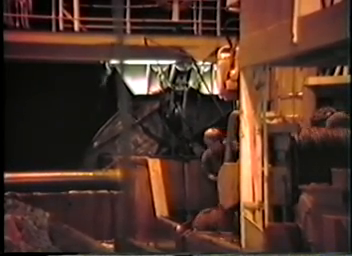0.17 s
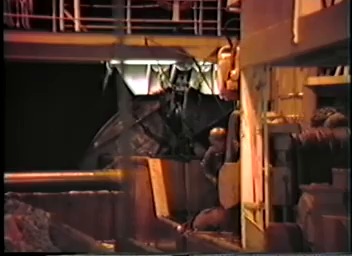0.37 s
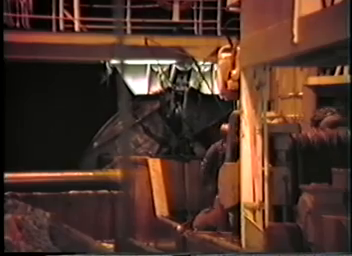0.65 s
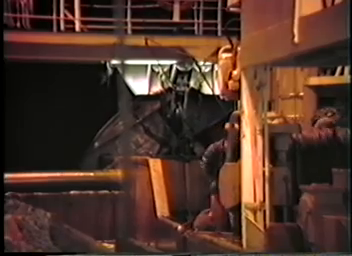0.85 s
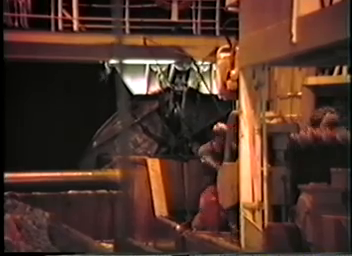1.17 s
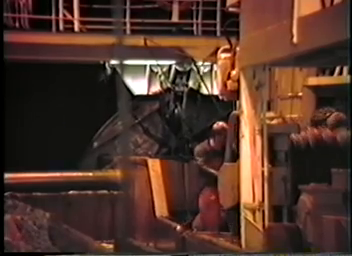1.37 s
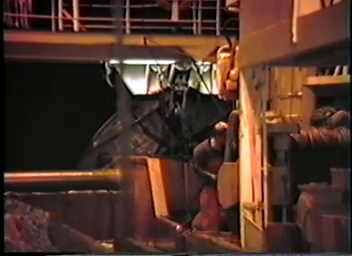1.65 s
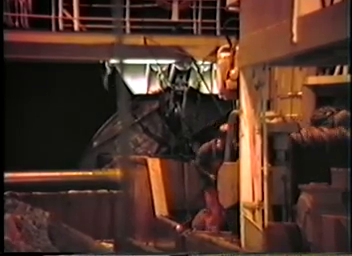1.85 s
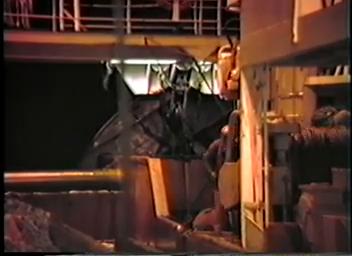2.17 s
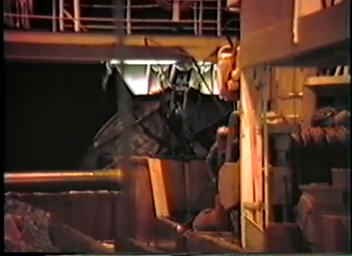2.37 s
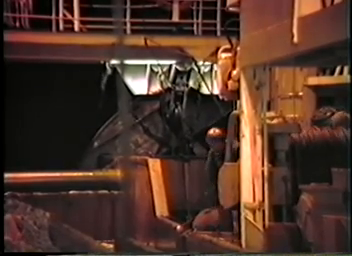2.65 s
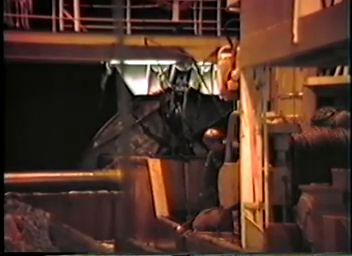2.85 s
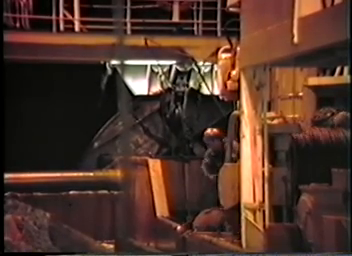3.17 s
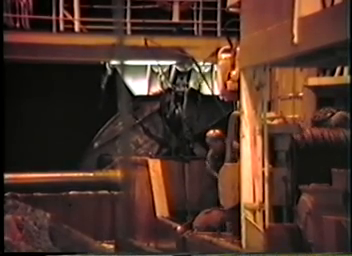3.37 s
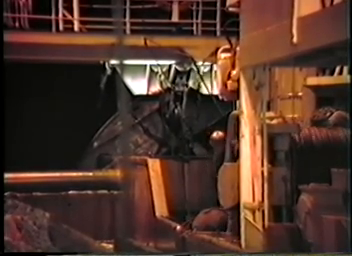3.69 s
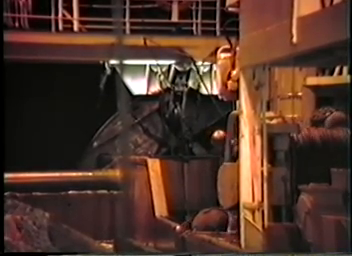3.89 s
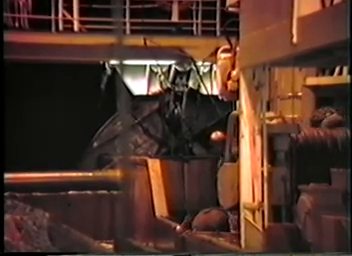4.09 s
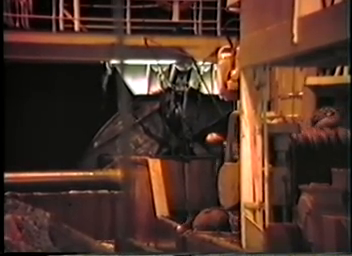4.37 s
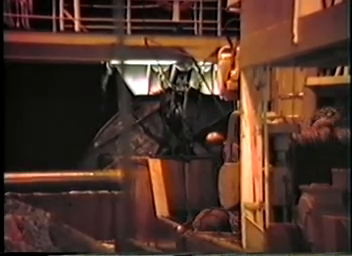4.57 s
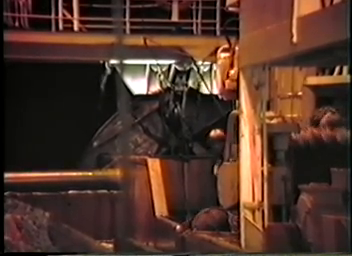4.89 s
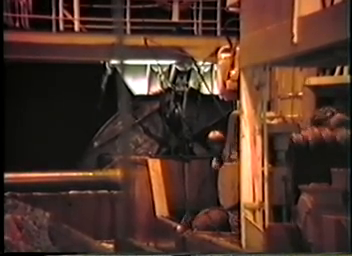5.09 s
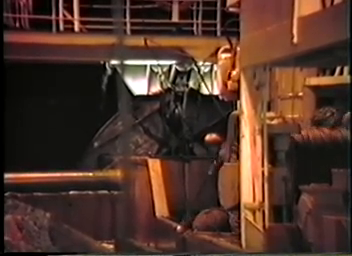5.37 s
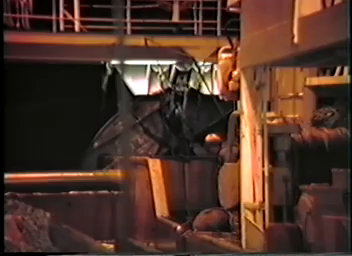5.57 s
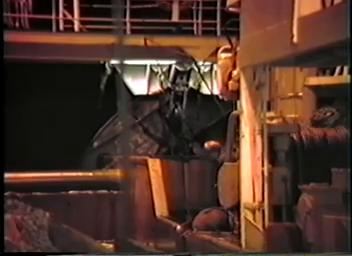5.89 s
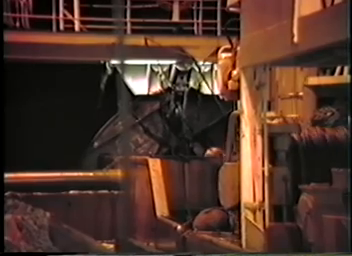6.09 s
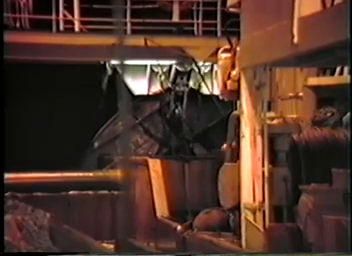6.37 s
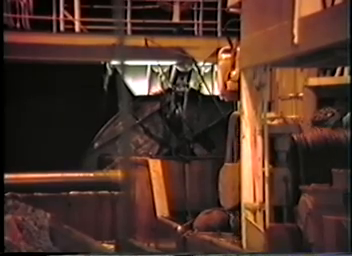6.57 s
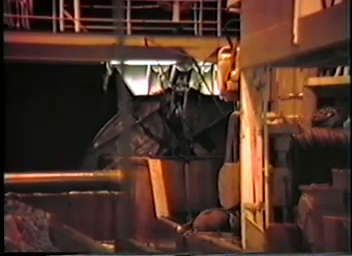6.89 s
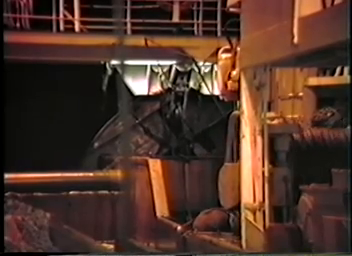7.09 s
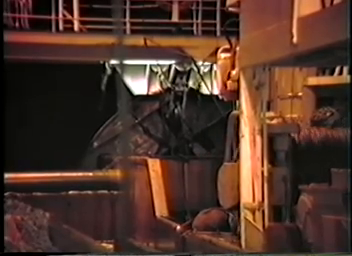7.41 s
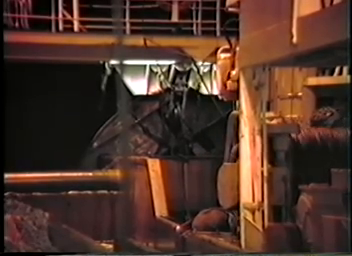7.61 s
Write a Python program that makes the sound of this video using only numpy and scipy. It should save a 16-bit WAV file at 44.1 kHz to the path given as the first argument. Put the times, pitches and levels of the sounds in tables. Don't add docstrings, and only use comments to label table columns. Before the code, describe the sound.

A large ship's diesel runs loudly from the start, repeating an uneven cluster of exhaust pulses about four times a second, one thud far stronger. Gear hum, singing steel plates and a broad fan roar surround it, while a high pump whine throbs three times a second. Faint chain ticks come irregularly. The engine works hardest around three seconds, then eases. Heard a few metres away on an open steel deck, with dull treble, hiss and buzz.

```python
import sys
import numpy as np
from scipy import signal
from scipy.fft import rfft, irfft
from scipy.io import wavfile

SR = 44100
rng = np.random.default_rng(int(sys.argv[2]) if len(sys.argv) > 2 else 0)


def elevation(decibels):
    levels = np.asarray(decibels, float)
    return 10 ** (levels / 20)


def store_wav(level_fs):
    pcm = np.round(np.clip(np.atleast_2d(level_fs), -1, 1) * 32767)
    wavfile.write(sys.argv[1], SR, pcm.T.astype(np.int16))


N = 341334
TIME = np.arange(N) / SR
CYCLE_S, FIRST_CYCLE_S = .240295, .0065


def rms_one(x):
    return x / np.sqrt(np.mean(x ** 2) + 1e-20)


def drift(rate_hz):
    r = np.exp(-80 * np.pi * rate_hz / SR)
    noise = rng.standard_normal(N // 40 + 2002)
    slow = signal.lfilter([1], [1, -2 * r, r * r], noise)[2000:]
    return np.interp(np.arange(N) / 40, np.arange(len(slow)), rms_one(slow))


def swells(rows, width_s):
    return sum(db * np.exp(-((TIME - s) / width_s) ** 2) for s, db in rows)


def coloured(spectrum):
    hz, db = np.transpose(spectrum)
    log_hz = np.log(np.fft.rfftfreq(N, 1 / SR) + 1)
    gain = elevation(np.interp(log_hz, np.log(hz), db))
    return rms_one(irfft(rfft(rng.standard_normal(N)) * gain, N))


def hum(phase, db, wobble, rate_hz):
    return np.sqrt(2) * elevation(db) * np.sin(phase + wobble * drift(rate_hz))


# time in seconds, effort in dB.
LOAD = [
    (0, -.5),
    (.6, .3),
    (3.0, .8),
    (4.9, .6),
    (5.6, -.3),
    (7.74, -.8),
]
# time in seconds, change in dB.
ODD_FIRINGS = [(.37, -1.5), (1.57, 1.2), (2.05, 1.2), (3.01, 1.4), (3.73, -1), (3.97, 1.2), (4.69, -.8),
               (4.93, 1.3), (5.17, -.8), (5.41, 1.2), (6.37, 1.3), (7.34, -1)]


def effort_db():
    s, db = np.transpose(LOAD)
    return np.interp(TIME, s, db) + swells(ODD_FIRINGS, .09)


def pipe(starts, pattern, hz, swell_s):
    after_s, peak_db = np.transpose(pattern)
    at = np.round((starts[:, None] + after_s) * SR).astype(int)
    strength = elevation(peak_db + .8 * rng.standard_normal(at.shape))
    inside = (at >= 0) & (at < N)
    clicks = np.bincount(at[inside], strength[inside], N)
    age = np.arange(SR // 10) / SR
    envelope = (age / swell_s) ** 2 * np.exp(2 - age / swell_s) / 4
    pulse = envelope * np.sin(2 * np.pi * hz * age)
    return signal.fftconvolve(clicks, pulse)[:N]


# seconds after the cycle start, peak level in dB.
FUNNEL = [(0.0162, -30.8), (0.0361, -36.0), (0.0451, -39.8), (0.0598, -35.5), (0.0888, -29.6),
          (0.1194, -30.7), (0.1412, -24.8), (0.1623, -32.1), (0.1868, -32.2), (0.2045, -40.1),
          (0.2152, -29.1), (0.2394, -40.3)]
SILENCER = [(0.0345, -22.8), (0.0491, -22.8), (0.0594, -29.9), (0.0694, -26.6), (0.0846, -24.3),
            (0.1062, -20.5), (0.1267, -19.0), (0.1413, -24.5), (0.1557, -26.9), (0.1779, -27.7),
            (0.22, -28.3), (0.2346, -28.3)]
MANIFOLD = [(0.0281, -18.2), (0.0452, -22.9), (0.0655, -17.1), (0.081, -17.2), (0.1003, -16.6),
            (0.1117, -5.8), (0.1238, -11.2), (0.1355, -16.9), (0.1469, -18.1), (0.1587, -23.0),
            (0.1854, -20.7), (0.2324, -22.3)]
ELBOW = [(0.0187, -21.7), (0.0298, -26.8), (0.0799, -23.1), (0.0909, -15.3), (0.1026, -23.9),
         (0.1175, -27.4), (0.1314, -19.1), (0.155, -21.6), (0.1665, -21.3), (0.1776, -25.9),
         (0.2136, -25.7), (0.239, -27.9)]
HEADS = [(0.0084, -20.8), (0.0273, -18.8), (0.0374, -20.8), (0.0711, -18.3), (0.0886, -21.4), (0.1, -12.6),
         (0.1174, -18.0), (0.1287, -20.8), (0.1402, -19.9), (0.155, -19.1), (0.1836, -18.9),
         (0.2376, -21.2)]


def exhaust():
    starts = FIRST_CYCLE_S + CYCLE_S * np.arange(-1, N / SR / CYCLE_S)
    starts = starts + .0002 * rng.standard_normal(len(starts))
    out = pipe(starts, FUNNEL, hz=91.06, swell_s=.006)
    out += pipe(starts, SILENCER, hz=165.75, swell_s=.004)
    out += pipe(starts, MANIFOLD, hz=285.6, swell_s=.004)
    out += pipe(starts, ELBOW, hz=397, swell_s=.003)
    out += pipe(starts, HEADS, hz=731.1, swell_s=.001)
    return out * elevation(effort_db())


GEAR_TEETH = [10, 12, 17, 192, 226, 452]
GEAR_DB = [-56, -50.5, -58, -32.5, -35, -41.5]


def gears():
    crank = 2 * np.pi * TIME / CYCLE_S + .0035 * drift(3.9)
    out = np.zeros(N)
    for teeth, db in zip(GEAR_TEETH, GEAR_DB):
        out += hum(teeth * crank, db + 2.5 * drift(7), wobble=.14, rate_hz=4)
    return out


# time in seconds, rise in dB.
CASING_SWELLS = [(.08, 7), (1.33, 13), (1.64, 7), (2.3, 6), (2.65, 7), (3.45, 9), (4.37, 10), (5.05, 10),
                 (5.41, 12), (5.63, 7), (6.92, 10), (7.52, 6)]


def generator():
    steady = hum(2 * np.pi * 498 * TIME, -29.5 + 1.8 * drift(9), wobble=.58, rate_hz=2.6)
    ring_db = -33 + swells(CASING_SWELLS, .07) + 1.8 * drift(9)
    return steady + hum(2 * np.pi * 392 * TIME, ring_db, wobble=1.38, rate_hz=2.4)


STROKE_ENDS = [-.16, .15, .45, .81, 1.13, 1.49, 1.8, 2.13, 2.44, 2.79, 3.1, 3.37, 3.66, 4.0, 4.34, 4.65,
               4.96, 5.22, 5.6, 5.89, 6.23, 6.51, 6.88, 7.17, 7.52, 7.84]


def pump():
    stroke = np.interp(TIME, STROKE_ENDS, np.arange(len(STROKE_ENDS)))
    dip = np.abs(np.cos(np.pi * stroke)) ** 5.2
    db = -30.5 - 13 * dip + .8 * drift(9)
    return hum(2 * np.pi * 2254 * TIME, db, wobble=1.4, rate_hz=11)


# time in seconds, rise in dB.
HATCH_SHAKES = [(.41, 10), (1.31, 7), (1.57, 5), (1.79, 10), (2.65, 5), (2.99, 6), (3.17, 5), (3.7, 5),
                (4.22, 6), (4.5, 5), (4.91, 8), (5.73, 5), (5.99, 4), (6.51, 8), (7.01, 6), (7.57, 9)]


def hatch():
    beat = np.cos(2 * np.pi * (TIME - FIRST_CYCLE_S - .1) / CYCLE_S)
    db = -25.5 + 1.5 * beat + .7 * swells(HATCH_SHAKES, .04) + 1.8 * drift(22)
    return hum(2 * np.pi * 608.8 * TIME, db, wobble=1.6, rate_hz=11)


def resonate(hz, width_hz):
    r = np.exp(-np.pi * width_hz / SR)
    poles = [1, -2 * r * np.cos(2 * np.pi * hz / SR), r * r]
    once = signal.lfilter([1, 0, -1], poles, rng.standard_normal(N))
    return rms_one(signal.lfilter([1, 0, -1], poles, once))


# resonance in Hz, width in Hz, level in dB rms.
PLATES = [
    (644.5, 12, -36),
    (826.2, 21, -34),
    (979, 16, -44),
    (1803, 14, -42),
    (4980, 160, -55.5),
]


def plates():
    return sum(elevation(db) * resonate(hz, width_hz) for hz, width_hz, db in PLATES)


# time in seconds, peak level in dB.
TICKS = [(0.1067, -39), (0.3775, -34), (0.4813, -41), (0.603, -37), (1.3239, -39), (2.0477, -36),
         (2.7671, -36), (3.252, -39), (3.9594, -36), (5.1198, -42), (5.6501, -39), (6.2028, -42),
         (6.33, -36), (6.556, -38), (7.5782, -39), (7.6226, -39)]


def ticks():
    strikes = np.zeros(N)
    for s, db in TICKS:
        strikes[round(s * SR)] = elevation(db - 9)
    fade = signal.lfilter([1], [1, -np.exp(-1 / (.008 * SR))], strikes + 1e-18)
    band = signal.butter(2, [4800, 8500], "band", fs=SR, output="sos")
    return fade * rms_one(signal.sosfilt(band, rng.standard_normal(N)))


# frequency in Hz, level in dB per Hz.
ROAR = [(250, -29.5), (420, -5.5), (544, -9), (605, -0.5), (689, -5.5), (802, -2.5), (871, -8), (1160, -11),
        (1850, -15), (2130, -18), (2230, -18), (2430, -20.5), (4220, -26), (5400, -44), (7000, -54),
        (9100, -78.5), (15400, -120)]
# frequency in Hz, level in dB per Hz.
RUMBLE = [(15, -45), (40, -25), (75, -20), (115, -10.5), (165, -10.5), (225, -9), (255, 0), (340, -6.5),
          (355, -4.5), (420, -8), (470, -9), (560, -4), (730, -40), (1230, -120)]


def roar():
    high_db = -16.3 + .4 * effort_db() + .4 * drift(30)
    low_db = -22.9 + .5 * drift(4.8)
    return elevation(high_db) * coloured(ROAR) + elevation(low_db) * coloured(RUMBLE)


# frequency in Hz, level in dB per Hz.
HISS = [(3240, -30), (5500, -1.5), (6190, 0.5), (7980, -6.5), (13400, -11.5), (14300, -16), (14450, -30),
        (14600, -80)]


def hiss():
    return elevation(-52.5 + .5 * drift(18)) * coloured(HISS)


def buzz():
    order = np.arange(32, 70)
    db = np.where(order % 3 == 0, -79, -84.5) - .2 * (order - 45)
    db = db + 1.2 * rng.standard_normal(len(order))
    turns = order[:, None] * 200.01 * TIME + rng.random((len(order), 1))
    return np.sqrt(2) * elevation(db) @ np.sin(2 * np.pi * turns)


def scene():
    engine = exhaust() + gears()
    return (engine + generator() + pump() + hatch() + plates() + roar() + ticks())[None]


def band_limit(x):
    return signal.sosfilt(signal.butter(12, 14340, fs=SR, output="sos"), x)


def record(dry):
    thin = signal.sosfilt(signal.butter(3, 32, "high", fs=SR, output="sos"), dry)
    rounded = thin / (1 + (np.abs(thin) / .97) ** 4) ** (1 / 4)
    dulled = signal.sosfilt(signal.butter(2, 9000, fs=SR, output="sos"), rounded)
    dropout_db = swells([(.4, -2.5)], .01)
    mix = dulled * elevation(dropout_db) + hiss() + buzz()
    return band_limit(mix)


dry = scene()
out = record(dry)
store_wav(out)
```